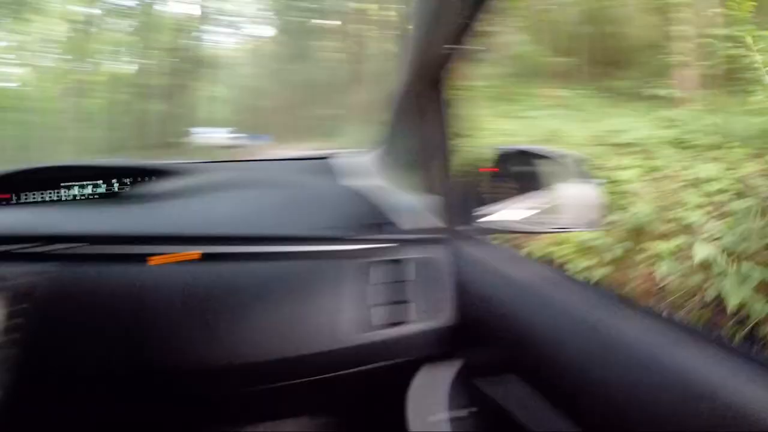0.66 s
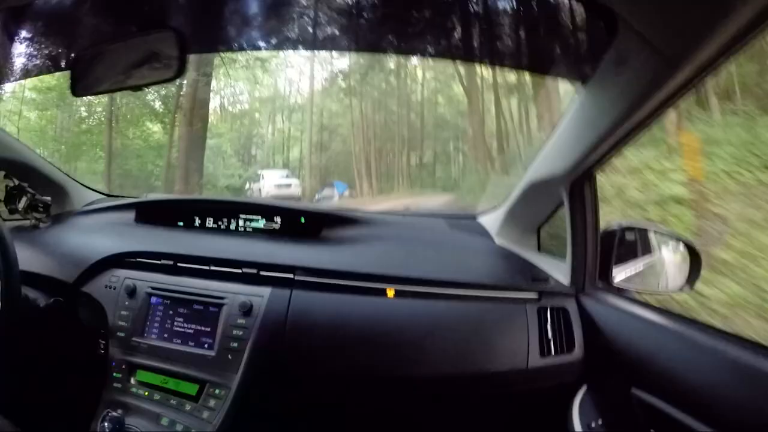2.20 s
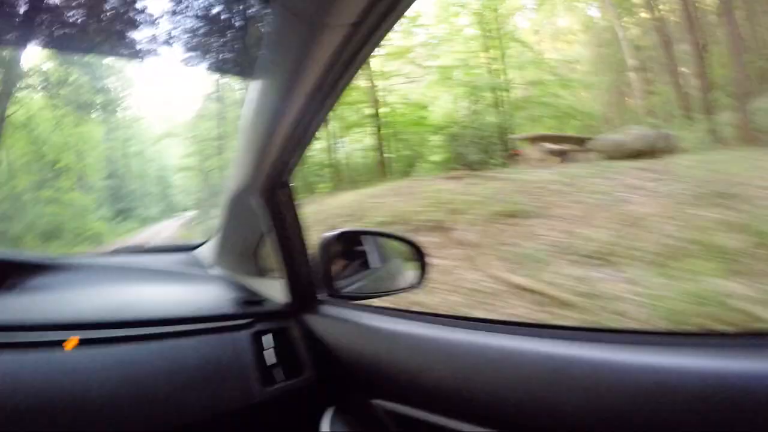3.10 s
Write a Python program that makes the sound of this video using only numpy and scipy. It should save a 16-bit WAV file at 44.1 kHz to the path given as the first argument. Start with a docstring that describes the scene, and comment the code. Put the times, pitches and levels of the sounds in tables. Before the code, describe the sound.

Inside a slowly moving car, low booming and tyre noise on gravel continue while loose trim knocks and ticks over bumps.

```python
"""A car rolls slowly along a gravel forest road, heard inside. From the start the cabin air booms, the tyres
roar and crunch, and bumps knock the trim; a limiter ducks the rest slightly with the boom. At 0.5 s flung
stones hit the underbody; rubbing trim squeaks, then knocks hardest at 0.95 s. Near 2 s metal jingles faintly
and loose plastic ticks hard; small things rustle, and at 3.2 s the sound jumps in a sharp click. The roar
slowly yields to body rumble; near 5.5 s the suspension thumps and a low drone peaks."""
import sys
import numpy as np
from scipy import signal
from scipy.fft import rfft, irfft, next_fast_len
from scipy.io import wavfile
from scipy.ndimage import uniform_filter1d, minimum_filter1d, map_coordinates

SR = 44100
rng = np.random.default_rng(int(sys.argv[2]) if len(sys.argv) > 2 else 0)


def wav_out(sig):
    """Save sig, one row per channel (or a flat mono array), as 16-bit PCM at SR to the path in sys.argv[1]."""
    wavfile.write(sys.argv[1], SR, np.round(np.clip(np.atleast_2d(sig).T, -1, 1) * 32767).astype(np.int16))


N = 270769
TIME_S = np.arange(N) / SR
FROM_MIDDLE_S = TIME_S - TIME_S.mean()
TOP_HZ = 15750

# brief swells and dips of tyre noise and body rumble, scaled per layer: t/s, relative level/dB
ROLLING_LEVEL = [(0.0, -2.5), (0.2, -0.6), (.33, -0.5), (.41, -0.5), (.6, 0), (.76, -0.5), (.86, 0),
                 (1.1, 1), (1.33, -0.95), (1.5, 1.5), (1.7, -0.6), (2.08, 0), (2.19, -0.5), (2.27, 1.8),
                 (2.4, -3.5), (2.5, 0), (2.6, -0.6), (2.82, 0.5), (3.0, -0.5), (3.14, 1.8), (3.33, -2.5),
                 (3.5, 0.8), (3.75, -1), (3.9, 0.5), (4.02, -1.2), (4.14, -0.6), (4.4, 0.9), (4.5, -0.6),
                 (4.6, -0.1), (4.88, -0.2), (4.97, -0.4), (5.08, 1), (5.24, -1), (5.35, 0.4), (5.6, 0.7),
                 (5.8, -0.2), (6.1, 0.5)]
# level curves: t/s, level/dB
CRACKLE_LEVEL = [(0, -69), (.3, -67), (1.8, -65), (2.15, -71), (2.9, -62), (3.3, -67), (3.7, -65),
                 (4.1, -73), (6.1, -71)]
HISS_LEVEL = [(0, -53), (1.6, -53.5), (3.6, -55), (4.1, -58), (5.4, -59), (6.1, -54)]
DRONE_LEVEL = [(0, -18), (2.7, -14), (4.8, -13.5), (5.6, -7.5), (5.85, -13.5)]
# noise spectra: f/Hz, relative density/dB
CRACKLE_SPECTRUM = [(4500, -20), (6500, 0.5), (9500, -2), (13700, 2.5), (15000, -8)]
ROAR_SPECTRUM = [(150, -23.5), (270, -3.5), (330, 2.5), (380, 2.5), (425, 0.5), (485, 1.5), (560, -6),
                 (700, -11.5), (1100, -14.5), (1500, -36.5), (2500, -44)]
CRUNCH_SPECTRUM = [(500, -11.5), (1200, 6), (1700, 2.5), (2200, 1), (2850, 0.5), (3400, -10.5), (4400, -8),
                   (5600, -18), (7500, -19), (14000, -29.5)]
HISS_SPECTRUM = [(2500, 6.5), (5500, 5.5), (8000, -5), (10000, -2.5), (13700, -8), (15500, -13.5)]
BOOM_SPECTRUM = [(5, -38.5), (12, -23), (18, 4.5), (24, 3), (33, -1), (42, -1), (60, -19)]
DRONE_SPECTRUM = [(32, -29), (44, -2), (53, 0), (64, -6.5), (76, -16.5), (120, -26)]
BODY_SPECTRUM = [(40, -41), (70, -1.5), (88, -1), (108, -12.5), (140, -8), (170, -16.5), (215, -15),
                 (280, -28), (450, -61.5)]
# resonances: f/Hz, relative level/dB, t60/s
METAL_MODES = [(6573, 0, 0.11), (8200, -3, 0.17)]
UNDERBODY_MODES = [(720, 0, 0.0077), (1070, -0.5, 0.0097), (1470, -7, 0.0089), (1940, -5.5, 0.0059),
                   (2530, -10, 0.011), (5000, -16, 0.0047)]
PLASTIC_MODES = [(465, -12, 0.028), (660, 1.5, 0.011), (1090, -0.5, 0.012), (1440, -13, 0.0099),
                 (1660, -16.5, 0.01), (2850, -16.5, 0.0077), (3380, -19.5, 0.0026), (6100, -21, 0.0028)]
TRIM_MODES = [(445, 9.5, 0.022), (560, -8.5, 0.034), (696, -7.5, 0.014), (938, -10, 0.038),
              (1108, -8, 0.027), (1280, -19, 0.015), (1820, -28, 0.019), (2790, -24, 0.024)]
DASH_CAVITY_MODES = [(382, -27, 0.25), (472.3, -18, 0.19)]
# noise bursts: t/s, level/dB, upper band edge/Hz, nominal length/s
CABIN_RUSTLES = [(.225, -57, 12000, .007), (.335, -59, 14000, .012), (.613, -55, 13000, 0.0099),
                 (.92, -53, 13500, 0.011), (1.46, -54, 13000, .009), (1.701, -51, 13500, .01),
                 (1.97, -57, 11000, 0.0067), (2.344, -52, 14500, .005), (2.571, -52, 13000, 0.004),
                 (2.683, -53, 12500, 0.0065), (2.873, -49.5, 11500, .006), (2.912, -51, 12000, .005),
                 (2.957, -51, 11500, .007), (3.514, -45.5, 7500, .003)]
GRAVEL_SCUFFS = [(.368, -45, 3400, 0.013), (.38, -39, 1400, 0.027), (.5285, -33.5, 6150, 0.0031),
                 (.743, -52, 5200, 0.023), (.918, -49, 6500, 0.02), (1.125, -47.5, 2920, 0.028),
                 (1.19, -44, 2800, 0.021), (1.452, -36.5, 1300, 0.011), (1.455, -41.5, 3280, 0.0097),
                 (1.56, -36, 1300, 0.015), (1.6, -38, 1300, .012), (2.245, -46, 3200, 0.016),
                 (2.622, -34.5, 1700, 0.01), (2.624, -40, 4930, 0.013), (2.681, -41.5, 5300, 0.015),
                 (2.695, -45, 2800, 0.023), (2.797, -34.5, 1250, 0.016), (2.8, -45.5, 4500, 0.015),
                 (3.04, -43, 1300, 0.02), (3.205, -43.5, 5600, 0.0081), (3.495, -35, 1900, 0.009),
                 (3.648, -48, 3000, 0.016), (3.676, -35, 1290, 0.019), (3.69, -48, 4500, .014),
                 (3.885, -38, 1280, 0.032), (4.108, -33.5, 1180, 0.013), (4.255, -38.5, 1100, 0.019),
                 (4.322, -38, 1300, 0.013), (4.42, -34, 1320, 0.015), (4.869, -36, 940, 0.024),
                 (5.067, -33, 1270, 0.023), (5.2, -38.5, 1190, .012), (5.298, -39.5, 1480, 0.015),
                 (5.592, -46, 3000, 0.011), (5.702, -43.5, 3800, 0.016), (5.887, -40, 1440, 0.023)]
SUSPENSION_THUMPS = [(1.2, -10, 110, 0.023), (1.45, -20, 210, 0.023), (2.245, -11, 151, 0.019),
                     (3.82, -18, 168, 0.073), (3.83, -29, 432, 0.045), (4.13, -18, 155, .04),
                     (5.52, -3, 117, 0.015)]
# touches on metal: t/s, level/dB
METAL_TOUCHES = [(1.84, -55), (1.893, -49.5), (2.2, -58), (2.245, -58)]
# rubbing trim: t/s, level/dB, f/Hz, length/s, relative pitch jitter
TRIM_RUBS = [(.662, -45.5, 2670, 0.06, 0.16), (0.753, -44, 2700, 0.057, .055),
             (1.14, -58, 13600, .16, .025), (5.546, -41.5, 1443, 0.11, 0.04),
             (6.048, -40.5, 2630, 0.056, 0.1)]
# impacts: t/s, level/dB, tilt/(dB/octave), contact cutoff/Hz, pitch ratio
PEBBLE_HITS = [(.514, -9.5, 1, 2900, 0.94), (0.529, -10.5, -9, 6000, 1), (.73, -20, -5, 1800, 1),
               (4.3651, -17, 4.5, 2880, 1.02), (5.904, -19.5, 0, 2600, 1.06)]
PLASTIC_HITS = [(2.1431, -1.4, 5, 3900, 1.05), (2.278, -17, 5, 4000, 1.14), (3.055, -16, 1, 1800, 0.89),
                (3.9365, -17, 3, 2600, 0.96), (4.603, -17.5, 9, 1780, 0.84), (4.93, -19, 1, 2600, 1.06),
                (5.08, -21, 4, 2400, 0.57), (6.033, -13, 0, 3000, 0.84)]
TRIM_HITS = [(0.084, -25, -5, 1500, 1.3), (.151, -15.5, -2, 1400, 0.93), (.402, -19.5, 3, 1400, 1.12),
             (.633, -18, -9, 900, 1.15), (0.946, 0, -1, 1370, 0.99), (0.954, -18, 1, 1200, 0.84),
             (.973, -13, -14, 800, 1), (1.063, -11.5, -9, 1200, 0.97), (1.111, -10.5, -4, 800, 0.86),
             (1.457, -16, -6, 1400, 1.02), (1.837, -14.5, -12, 3000, 1.03), (1.955, -14, -6, 2000, 0.79),
             (2.048, -12.5, -0.5, 1980, 0.99), (2.243, -14, -3, 3000, 1.02), (2.478, -13.5, -1, 1000, 0.9),
             (2.839, -13.5, -8, 900, 1.11), (3.055, -23, 12, 1600, 0.97), (3.167, -13, -9, 1010, 0.95),
             (3.496, -8, -1.5, 2000, 1.06), (3.503, -13.5, 5, 1500, 1), (3.936, -17.5, 10, 2010, 0.97),
             (4.595, -17.5, -1, 790, 1.2), (4.871, -16, 2, 1200, 0.98), (4.3652, -24, -6, 1000, 1.2),
             (5.079, -20.5, 1, 1400, 0.91), (5.838, -24.5, 5, 2000, 1.18)]


def amp(db):
    """dB to gain."""
    return 10 ** (np.asarray(db) / 20)


def unit(x):
    """Scale to rms 1."""
    return x / np.sqrt(np.mean(x ** 2) + 1e-20)


def noise():
    """White noise."""
    return rng.standard_normal(N)


def curve(points):
    """Per-sample values from (t/s, value) points."""
    return np.interp(TIME_S, *np.transpose(points))


def wobble(knots_per_s):
    """Smooth random curve."""
    return map_coordinates(rng.standard_normal(int(N * knots_per_s / SR) + 4), [TIME_S * knots_per_s])


def filtered(x, response):
    """Apply a gain given as a function of f/Hz."""
    size = next_fast_len(N + SR // 2)
    return irfft(rfft(x, size) * response(np.fft.rfftfreq(size, 1 / SR)), size)[:N]


def coloured(x, spectrum):
    """Shape x by a spectrum, rolled off past its ends; rms 1."""
    hz, db = np.transpose(spectrum)
    log_hz = np.log(np.r_[hz[0] / 2, hz, hz[-1] * 2])
    db = np.r_[db[0] - 20, db, -120]
    return unit(filtered(x, lambda f: amp(np.interp(np.log(f + 1e-3), log_hz, db))))


def add(track, start_s, sound):
    """Mix a sound into the track."""
    start = max(round(start_s * SR), 0)
    track[start:start + len(sound)] += sound[:max(N - start, 0)]


def contacts(per_s, spread_db):
    """Random impulses of varying force; rms 1."""
    force = amp(spread_db * np.clip(noise(), -2, 2))
    return unit((rng.random(N) < per_s / SR) * force * np.sign(noise()))


def ringing(modes, length_s):
    """Sum of decaying sines."""
    t = np.arange(round(length_s * SR)) / SR
    return sum(amp(db - 60 * t / t60_s) * np.sin(2 * np.pi * hz * t) for hz, db, t60_s in modes)


def strike(modes, pitch, tilt_db_oct, contact_hz, scatter_db, grit, grit_t60_s, alternate):
    """One blow, peak 1: ringing modes plus a short rattle; soft contact cuts the treble."""
    t = np.arange(SR // 6) / SR
    modes = np.multiply(modes, [pitch, 1, 1])
    ring = np.zeros(len(t))
    for k, (hz, db, t60_s) in enumerate(modes):
        level_db = db + tilt_db_oct * np.log2(hz / modes[0][0]) + scatter_db * rng.standard_normal()
        polarity = (-1) ** k if alternate else 1
        ring += polarity * amp(level_db - 60 * t / t60_s) * np.sin(2 * np.pi * hz * t)
    rattle = rng.standard_normal(len(t)) * amp(-60 * t / grit_t60_s)
    lowpass = signal.butter(3, min(contact_hz, TOP_HZ), fs=SR, output="sos")
    blow = signal.sosfilt(lowpass, ring / np.abs(ring).max() + grit * rattle)
    return blow / np.abs(blow).max()


def reflections(x, t60_s):
    """Dense echoes off windows and roof, from 4 ms on."""
    t = np.arange(SR // 6) / SR
    tail = rng.standard_normal(len(t)) * amp(-60 * t / t60_s) * (t > .004)
    return signal.fftconvolve(x, tail / np.linalg.norm(tail))[:len(x)]


def bursts(rows):
    """Rustles, scuffs or thumps: grainy band noise, peaking at half its nominal length."""
    out = np.zeros(N)
    t = np.arange(SR // 2) / SR
    for start_s, db, upper_hz, length_s in rows:
        edges_hz = np.clip([upper_hz / 2.88, upper_hz * 0.98], 50, SR * .45)
        grains = rng.standard_normal(len(t)) * amp(2.4 * rng.standard_normal(len(t)))
        band = unit(signal.sosfilt(signal.butter(3, edges_hz, "band", fs=SR, output="sos"), grains))
        age = 2 * t / length_s
        add(out, start_s, amp(db + 2.0) * band * age * np.exp(1 - age))
    return out


def crackle():
    """Faint flurries of grains in the top octaves."""
    t = np.arange(SR // 30) / SR
    onsets = np.abs(contacts(per_s=49, spread_db=1))
    flurries = signal.fftconvolve(onsets, np.exp(-t / .006))[:N]
    grains = flurries * contacts(per_s=3400, spread_db=2)
    return amp(curve(CRACKLE_LEVEL)) * coloured(grains, CRACKLE_SPECTRUM)


def jingles():
    """Light touches ring a small piece of metal."""
    out = np.zeros(N)
    ring = ringing(METAL_MODES, length_s=1 / 4)
    for start_s, db in METAL_TOUCHES:
        add(out, start_s, amp(db) * ring)
    return out


def squeaks():
    """Trim rubs on trim: a brief tone, gritty when the slips are uneven."""
    out = np.zeros(N)
    for start_s, db, hz, length_s, jitter in TRIM_RUBS:
        swell = np.sin(np.pi * np.clip((TIME_S - start_s) / length_s, 0, 1))
        slip_hz = hz * (1 + jitter * wobble(700))
        out += amp(db + 3.7 * wobble(160)) * swell * np.sin(2 * np.pi * np.cumsum(slip_hz) / SR)
    return out


def click(at_s, peak, decay_s):
    """A sharp, dry click: an abrupt step in the signal."""
    return peak * np.sign(TIME_S - at_s) * np.exp(-np.abs(TIME_S - at_s) / decay_s)


def pebbles():
    """Stones flung by the tyres snap against the underbody."""
    out = np.zeros(N)
    for start_s, db, tilt_db_oct, contact_hz, pitch in PEBBLE_HITS:
        blow = strike(UNDERBODY_MODES, pitch, tilt_db_oct, contact_hz,
                      scatter_db=3, grit=0.045, grit_t60_s=0.012, alternate=True)
        add(out, start_s, amp(db) * blow)
    return out


def ticks():
    """Loose plastic strikes hard and rings briefly."""
    out = np.zeros(N)
    for start_s, db, tilt_db_oct, contact_hz, pitch in PLASTIC_HITS:
        blow = strike(PLASTIC_MODES, pitch, tilt_db_oct, contact_hz,
                      scatter_db=1, grit=0.048, grit_t60_s=0.012, alternate=False)
        add(out, start_s, amp(db) * blow)
    return out


def knocks():
    """Bumps knock the dash and door trim; the cavity behind the dash rings on."""
    out = np.zeros(N)
    cavity = ringing(DASH_CAVITY_MODES, length_s=1 / 6)
    for start_s, db, tilt_db_oct, contact_hz, pitch in TRIM_HITS:
        blow = strike(TRIM_MODES, pitch, tilt_db_oct, contact_hz,
                      scatter_db=5.5, grit=0.19, grit_t60_s=0.052, alternate=True)
        add(out, start_s, amp(db) * (blow + cavity + amp(-6.5) * reflections(blow, t60_s=0.082)))
    return out


def tyres(rolling_db):
    """Stones pass under the tyres in clumps: roar, crunch and hiss, swelling and dipping together."""
    clumps = wobble(34)
    roar = coloured(contacts(per_s=1200, spread_db=2.0) + 0.99 * noise(), ROAR_SPECTRUM)
    stones_per_s = 450 * amp(6.5 * wobble(22.1))
    crunch = coloured(contacts(stones_per_s, spread_db=0.5) + 1.12 * noise(), CRUNCH_SPECTRUM)
    hiss = coloured(contacts(per_s=700, spread_db=2.2) + 1.66 * noise(), HISS_SPECTRUM)
    roar_db = -31 - 0.45 * FROM_MIDDLE_S + 2.2 * rolling_db + 1.5 * clumps
    crunch_db = -45.5 + 1.25 * rolling_db + 0.71 * clumps
    hiss_db = curve(HISS_LEVEL) + rolling_db + 1.6 * wobble(60)
    return amp(roar_db) * roar + amp(crunch_db) * crunch + amp(hiss_db) * hiss


def body_rumble(rolling_db):
    """The road shakes the body panels; the rumble slowly grows."""
    level_db = -19.5 + 0.32 * FROM_MIDDLE_S + 0.98 * rolling_db + 1.1 * wobble(12)
    return amp(level_db) * coloured(noise(), BODY_SPECTRUM)


def cabin_boom():
    """Cabin air throbs at its lowest resonance, amid a broad boom and a swelling drone."""
    throb_hz = 26.73 * np.exp(0.1489 * wobble(13))
    swing = amp(1.3 * wobble(8))
    throb = unit(swing * np.sin(2 * np.pi * np.cumsum(throb_hz) / SR))
    boom = coloured(noise(), BOOM_SPECTRUM)
    drone = coloured(noise(), DRONE_SPECTRUM)
    return amp(-7.5) * throb + amp(-7) * boom + amp(curve(DRONE_LEVEL)) * drone


def scene():
    """Mono mix at the front seat."""
    rolling_db = curve(ROLLING_LEVEL)
    rolling = cabin_boom() + body_rumble(rolling_db) + tyres(rolling_db)
    road_hits = bursts(SUSPENSION_THUMPS) + bursts(GRAVEL_SCUFFS) + pebbles()
    cabin_hits = knocks() + ticks()
    small_sounds = bursts(CABIN_RUSTLES) + crackle() + squeaks() + jingles()
    dry_click = click(at_s=3.1671, peak=.66, decay_s=.0018)
    return (rolling + road_hits + cabin_hits + small_sounds + dry_click)[None]


def record(dry):
    """Two-band look-ahead limiter, driven mainly by the boom; then a low-pass."""
    ceiling, hold_samples, split_hz = .98, int(.018 * SR), 140

    def held(gain):
        """Hold and smooth the gain dips."""
        return uniform_filter1d(minimum_filter1d(np.clip(gain, 0, 1), hold_samples), hold_samples)

    bass = filtered(dry[0], lambda hz: 1 / (1 + (hz / split_hz) ** 4))
    upper = dry[0] - bass
    swing = np.abs(bass) + 1e-9
    upper = upper * held(ceiling / swing) ** .5  # ducks by half the bass overshoot in dB
    bass = bass * held((ceiling - np.sign(bass) * upper) / swing)  # also yields to loud knocks
    return filtered(bass + upper, lambda hz: np.interp(hz, [TOP_HZ - 600, TOP_HZ + 300], [1, 0]))[None]


dry = scene()
out = record(dry)
wav_out(out)
```